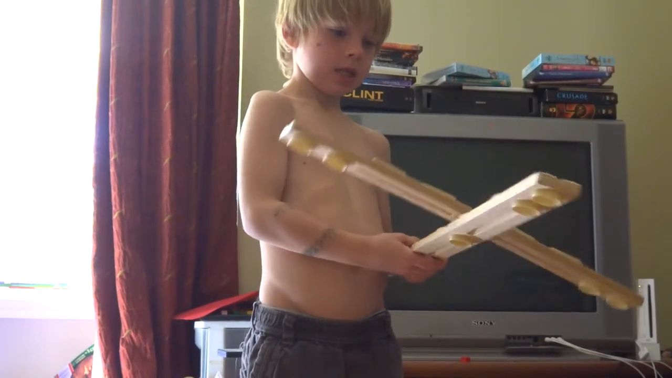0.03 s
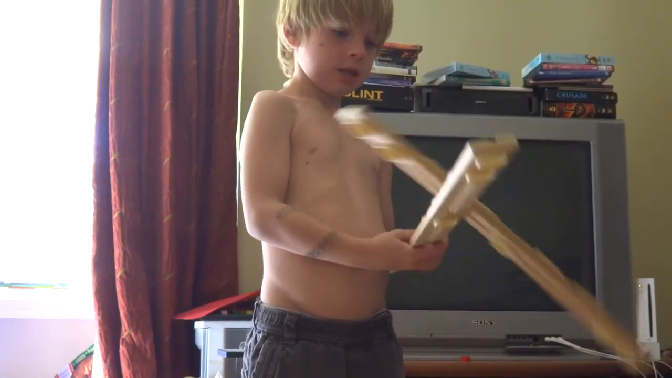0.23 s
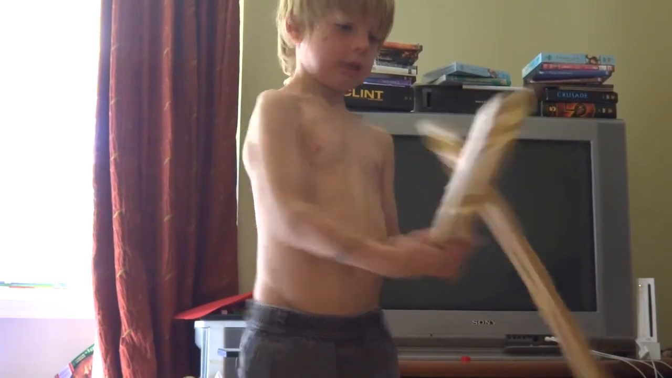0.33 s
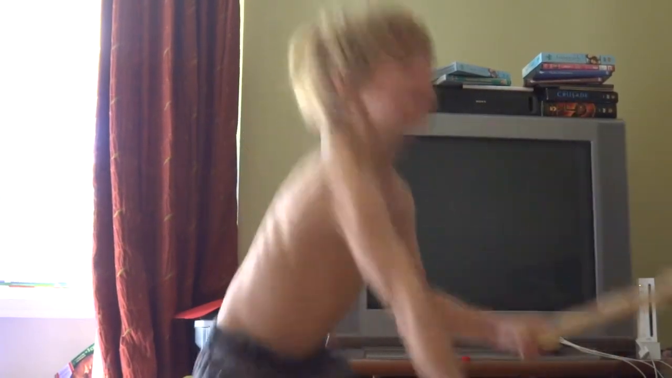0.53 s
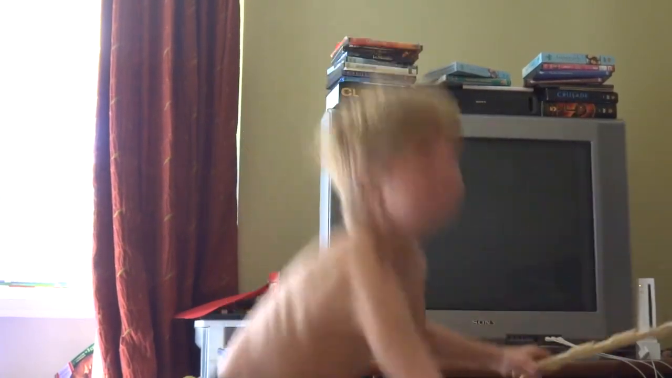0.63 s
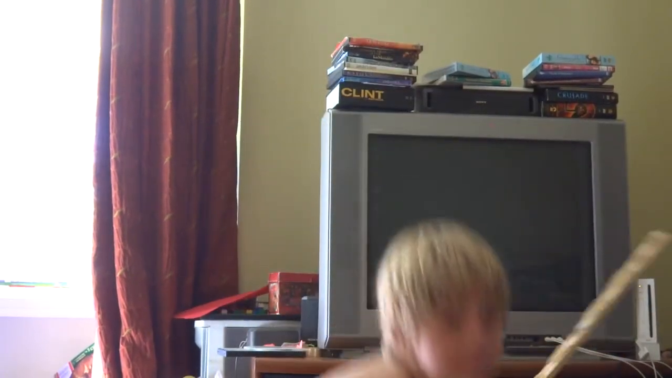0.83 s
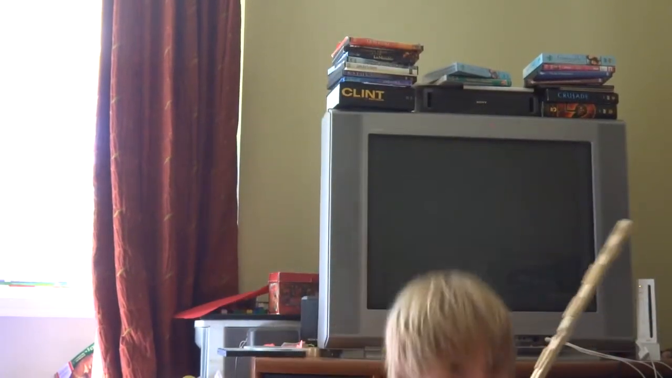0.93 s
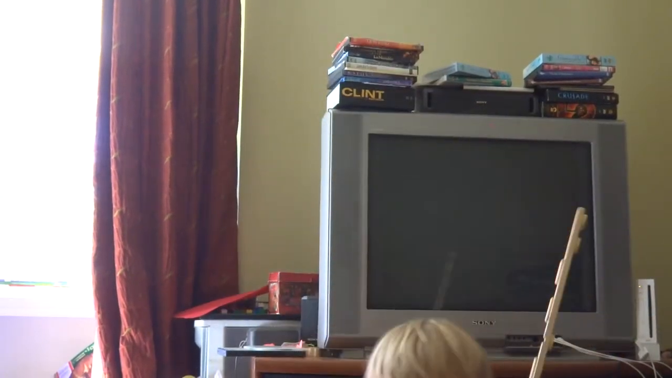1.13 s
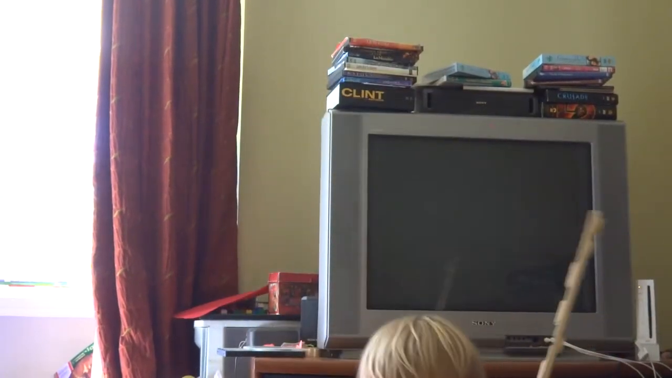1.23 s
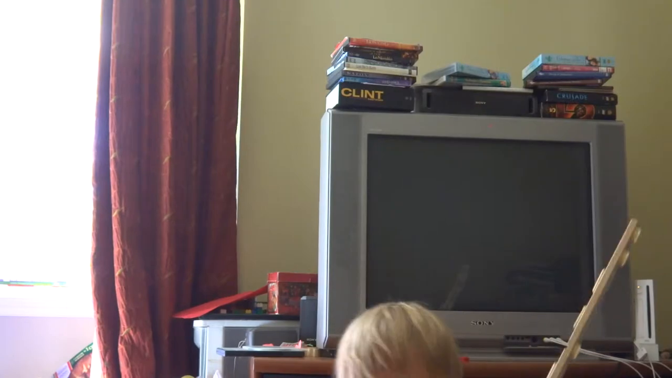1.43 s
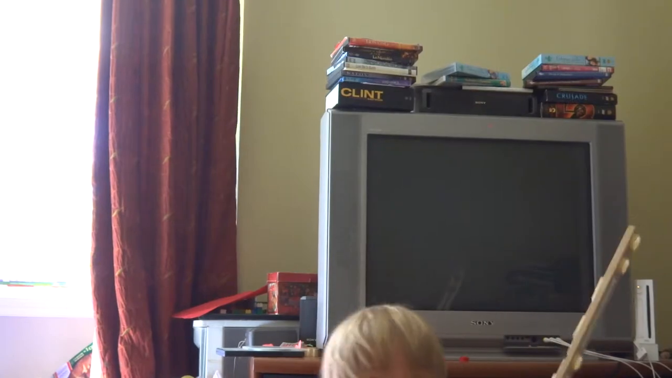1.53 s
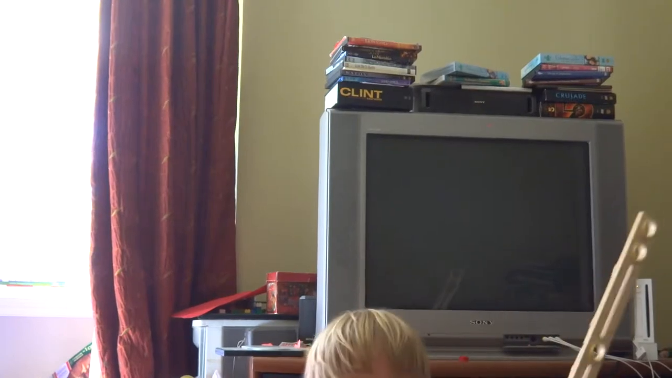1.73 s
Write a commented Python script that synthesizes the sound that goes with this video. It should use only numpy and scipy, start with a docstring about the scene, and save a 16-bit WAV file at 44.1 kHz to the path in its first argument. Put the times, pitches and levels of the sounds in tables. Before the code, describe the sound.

Light wooden knocks lead to a deep floor thump and a loud, dense clatter of wooden pieces bouncing on boards, quickly thinning to small clicks and rustle; small room, close microphone.

```python
"""Wooden toy pieces rustle and knock together in a child's hands, a body thumps down on a board floor,
and the pieces crash, clatter and bounce on the boards in a small living room, heard close.
Knocks are noisy blows ringing wood modes; clatter, rustle, rattle, clunk, boards and shake are random
taps and noise coloured by a body; squeaks are noise in one resonance; thumps are damped sines."""
import sys
import numpy as np
from scipy import signal
from scipy.fft import rfft, irfft
from scipy.io import wavfile

SR = 44100
rng = np.random.default_rng(int(sys.argv[2]) if len(sys.argv) > 2 else 0)


def file_out(sig):
    """Save sig as 16-bit WAV at sys.argv[1]."""
    # one column per channel
    cols = np.atleast_2d(sig).T
    # limit, then scale
    lim = np.clip(cols, -1, 1)
    pcm = np.round(lim * 32767).astype(np.int16)
    wavfile.write(sys.argv[1], SR, pcm)


N = 77175


def amp(db):
    """Decibels to gain."""
    return 10 ** (np.asarray(db) / 20)


def evened(x):
    """Scales to rms 1."""
    return x / np.sqrt(np.mean(x ** 2) + 1e-20)


def read(points, hz):
    """Reads a table on a log-frequency axis."""
    f, value = np.transpose(points)
    return np.interp(np.log(hz + 1), np.log(f + 1), value)


def add(mix, start_s, sound):
    """Mixes a sound in at a time."""
    part = mix[round(start_s * SR):][:len(sound)]
    part += sound[:len(part)]


def spread(a, b):
    """Left is a; right blends a with b by the likeness at each frequency; a level lean tilts the pair."""
    # Each row: frequency in Hz, left-right likeness from 0 to 1.
    likeness = [(60, 0.9), (140, 1), (350, 0.91), (840, 0.63), (2010, 0.53), (4840, 0.63), (11600, 0.75)]
    # Each row: frequency in Hz, left minus right in dB.
    lean_db = [(60, 1), (220, 0.5), (840, -1.0), (3120, -2), (11600, 0.5)]
    hz = np.fft.rfftfreq(N, 1 / SR)
    same = np.clip(read(likeness, hz), 0, 1)
    lean = amp(read(lean_db, hz) / 2)
    za, zb = rfft(a), rfft(b)
    left = za * lean
    right = (same * za + np.sqrt(1 - same ** 2) * zb) / lean
    return np.array([irfft(left, N), irfft(right, N)])


def level(curve, layer=None):
    """Gain over time: a slow background plus, if a layer is given, its part of every spill, by power."""
    # Starts of the spills of many pieces at once, in seconds.
    spill_start_s = [.172, .231, .29, .387, .480, .519, .536, .652, .7155, .864, .955, 1.080, 1.192, 1.449]
    # Each row, one spill: rise in seconds (0.1 ms is added), length of the sag in seconds,
    # clatter level in dB, top level in dB, body level in dB, sag in dB per second.
    spills = [(0.0011, 0.021, -42, -49, -55, 158), (0.0041, 0.11, -26.5, -63, -35, 196),
              (0.038, 0.058, -30, -38, -49.5, 89), (.003, 0.02, -29, -31, -34.5, 253),
              (0.002, 0.0093, -38, -47, -39, 198), (0.0065, 0.043, -59, -55, -39, 160),
              (0.0084, 0.12, -41.5, -32, -64, 47), (0.0013, 0.022, -31, -31, -40, 205),
              (0.0018, 0.12, -19, -27, -35.5, 23.5), (0.0014, 0.036, -27, -44, -21.5, 49),
              (.011, 0.048, -20, -30, -30, 58), (0.0066, 0.021, -22.5, -60, -23, 37),
              (0.0042, .025, -41.5, -66, -39.5, 200), (0.0035, 0.075, -39, -39.5, -41.5, 53)]
    # Fall after the sag in dB per second: clatter, top, body.
    end_db_per_s = 267, 320, 390
    t = np.arange(N) / SR
    s, db = np.transpose(curve)
    power = amp(np.interp(t, s, db)) ** 2
    if layer is None:
        return np.sqrt(power)
    for start_s, row in zip(spill_start_s, spills):
        since = t - start_s
        rise_s, length_s, sag_db_per_s = row[0] + 1e-4, row[1], row[5]
        fall_db = sag_db_per_s * np.clip(since - rise_s, 0, length_s)
        fall_db = fall_db + end_db_per_s[layer] * np.maximum(since - rise_s - length_s, 0)
        spill = np.clip(since / rise_s, 0, 1) * amp(row[2 + layer] - fall_db)
        power = power + spill ** 2
    return np.sqrt(power)


def patter(gain_t, tone, per_s, spread_db, tap_s, wash):
    """Random decaying taps over a steady wash shape noise, coloured by a body and following a level curve."""
    # Narrow rings of the pieces. Each row: frequency in Hz, width at half the dB in Hz, dB over the body.
    rings = [(839, 16.7, 7), (930, 29, 10), (1122, 16.7, 8.5), (1547, 20, 6), (1926, 66, 9.5),
             (2274, 42, 8), (3140, 124, 6.5), (3670, 160, 13), (4252, 78, 8), (4480, 17, 4),
             (5310, 23, -10), (5940, 20, -13), (6080, 20, -4), (6210, 17, 8.5), (7200, 76, 6.5),
             (7670, 140, 9.5), (9510, 40, 5)]
    luck = np.minimum(rng.exponential(1, N), 2.2)
    size = amp(spread_db * luck) * (rng.random(N) < per_s / SR)
    t = np.arange(2000) / SR
    taps = signal.oaconvolve(size, np.exp(-t / tap_s))[:N]
    shape = evened(taps) + wash
    hz = np.fft.rfftfreq(N, 1 / SR)
    rings_db = sum(db / (1 + (2 * (hz - f) / width) ** 2) for f, width, db in rings)
    in_band = (hz > tone[0][0]) * (hz < tone[-1][0])
    gain = amp(read(tone, hz) + rings_db) * in_band
    a, b = irfft(rfft(shape * rng.standard_normal((2, N))) * gain, N)
    return evened(spread(a, b)) * gain_t


def clatter():
    """Dense clatter of many pieces: 900 very short taps a second over a strong wash."""
    # Each row: time in seconds, background level in dB.
    curve = [(0, -62.5), (.17, -48), (.3, -37), (.41, -46), (.7, -47), (.86, -38), (1.05, -30), (1.14, -47),
             (1.212, -54), (1.3, -54), (1.412, -43.5), (1.54, -42), (1.6, -44.5), (1.75, -47)]
    # Each row: frequency in Hz, body gain in dB.
    tone = [(880, -17), (1500, -2.5), (1910, -6.5), (2800, 3.5), (3140, 1), (3820, -3), (4290, 5),
            (6010, 12.5), (8780, -21), (9870, -3.5), (11200, -26), (14600, -51), (22000, -120)]
    return patter(level(curve, 0), tone, per_s=900, spread_db=0.87, tap_s=0.00031, wash=2.0)


def rustle():
    """Fine high rustle of pieces sliding: 600 near-equal taps a second."""
    # Each row: time in seconds, background level in dB.
    curve = [(0.0, -53), (0.112, -46.5), (0.432, -45.5), (0.628, -38.5), (0.74, -43), (0.95, -49),
             (1.116, -55.5), (1.378, -49.5), (1.54, -42.5), (1.75, -45.5)]
    # Each row: frequency in Hz, body gain in dB.
    tone = [(2650, -39), (4500, -29), (4600, -39), (4950, -4), (5180, -60), (6670, 3), (7310, 1),
            (8640, -0.5), (9760, 6), (11200, -6), (14600, -29), (22000, -120)]
    return patter(level(curve, 1), tone, per_s=600, spread_db=1.0, tap_s=0.0014, wash=1.0)


def rattle():
    """Hollow rattle of the pieces' bodies: 300 uneven taps a second."""
    # Each row: time in seconds, background level in dB.
    curve = [(0, -68), (.13, -62.5), (.19, -49.5), (.354, -48), (.6, -52), (.7, -55), (.8, -34), (.93, -29),
             (1.05, -30.5), (1.16, -38), (1.246, -51), (1.4, -53.5), (1.55, -53.5), (1.66, -48.5),
             (1.75, -54.5)]
    # Each row: frequency in Hz, body gain in dB.
    tone = [(460, -65), (780, -5.5), (1090, 3), (1260, 1), (1550, 3), (1690, 0.5), (2140, 1), (2370, -3.5),
            (3500, -12), (4550, -34), (7700, -120)]
    return patter(level(curve, 2), tone, per_s=300, spread_db=7.6, tap_s=0.0029, wash=1.0)


def clunk():
    """Dull low-middle clunk of the larger pieces: 150 uneven taps a second, little wash."""
    # Each row: time in seconds, level in dB.
    curve = [(0.0, -66.5), (0.14, -69), (0.248, -60), (0.36, -68), (0.388, -49.5), (0.55, -43.5),
             (0.614, -59), (0.638, -71), (0.736, -39), (0.828, -49), (0.876, -28), (0.974, -41),
             (1.076, -38), (1.364, -59.5), (1.51, -53), (1.588, -70), (1.666, -72), (1.75, -67)]
    # Each row: frequency in Hz, body gain in dB.
    tone = [(380, 0), (450, 5), (600, 4.5), (760, 3.5), (880, 1.5)]
    return patter(level(curve), tone, per_s=150, spread_db=7.5, tap_s=0.0034, wash=0.36)


def boards():
    """Floorboards drumming: 90 low taps a second."""
    # Each row: time in seconds, level in dB.
    curve = [(0.0, -70.5), (0.14, -69), (0.252, -65.5), (0.354, -77), (0.388, -54), (0.432, -54.5),
             (0.588, -55), (0.608, -107), (0.632, -31.5), (0.778, -39.5), (0.856, -34.5), (0.876, -21),
             (0.91, -22.5), (0.964, -30.5), (0.994, -26), (1.154, -32), (1.184, -37.5), (1.378, -50.5),
             (1.446, -47), (1.632, -56), (1.666, -47), (1.75, -59)]
    # Each row: frequency in Hz, body gain in dB.
    tone = [(59, -41), (100, -15.5), (140, -17), (173, -7.5), (243, 1), (313, -7.5), (419, -13.5),
            (526, -23), (700, -21.5), (910, -25.5), (1540, -120)]
    return patter(level(curve), tone, per_s=90, spread_db=4.4, tap_s=0.0097, wash=0.65)


def shake():
    """Deep shake beneath the boards: 30 long taps a second."""
    # Each row: time in seconds, level in dB.
    curve = [(0.0, -64), (0.306, -69.5), (0.482, -58.5), (0.75, -47), (0.804, -45), (0.954, -39.5),
             (1.13, -48.5), (1.262, -51), (1.666, -65), (1.75, -66)]
    # Each row: frequency in Hz, body gain in dB.
    tone = [(12, -43), (20, -32), (43, 0.5), (81, -10), (134, -5.5), (160, -11.5), (210, -14), (350, -120)]
    return patter(level(curve), tone, per_s=30, spread_db=4.1, tap_s=0.052, wash=1.0)


def knock(middle_db, low_db, top_db):
    """A short rough blow rings the wood; low, middle and top modes take their own strength."""
    # Each row: nominal frequency in Hz, level within its group in dB, t60 in seconds.
    wood_modes = [(920, -33, 0.0089), (1327, 8, 0.042), (1804, 18, 0.045), (1950, -8, .014),
                  (2530, 10, 0.022), (3265, 0.5, 0.015), (3900, 2, .012), (4360, 1.5, 0.014),
                  (5260, -6, 0.03), (6110, 1.5, 0.0092), (6810, -4, 0.024), (7320, -5, .008),
                  (8500, -8.5, 0.013), (9280, -5.5, 0.015), (10360, -7.5, 0.012)]
    blow_t60_s = 0.0073
    t = np.arange(2600) / SR
    hz, mode_db, t60_s = np.transpose(wood_modes)[:, :, None]
    detune, phase = rng.random((2, len(wood_modes), 1))
    cycles = hz * (0.96 + 0.081 * detune) * t + 0.35 * phase
    modes = amp(mode_db - 60 * t / t60_s) * np.sin(2 * np.pi * cycles)
    modes = modes * np.minimum(t / 0.00015, 1)  # soft contact
    blow = rng.standard_normal(len(t)) * amp(-60 * t / blow_t60_s)
    blow[0] += 4.0
    rung = signal.fftconvolve(modes, blow[None], axes=1)[:, :len(t)]
    low, top = hz[:, 0] < 2700, hz[:, 0] > 7300
    out = np.zeros(len(t))
    for group, db in ((low, low_db), (top, top_db), (~(low | top), middle_db)):
        part = rung[group].sum(0)
        out += amp(db) * part / abs(part).max()
    return out


def knocks():
    """Single knocks of wood on wood, high-passed at 750 Hz."""
    # Each row: start in seconds, then peak before the high-pass in dB of the middle, low and top modes.
    hits = [(0.0135, -38, -79, -54), (0.065, -43, -77, -56), (0.098, -52, -47, -47),
            (0.1741, -51, -30.5, -30), (0.2296, -17, -20, -58), (0.2364, -15, -47, -57),
            (0.385, -21, -20.5, -29), (0.3933, -42, -22.5, -21), (0.433, -23.5, -34, -41),
            (0.4797, -23, -47, -34), (0.554, -45, -43, -23.5), (0.6435, -18.5, -26, -23.5),
            (0.6544, -46, -45, -40), (0.715, -8.5, -32, -44), (0.719, -5.5, -40, -24),
            (0.7358, -11, -47, -18.5), (0.8636, -24, -22, -45), (0.944, -20, -14, -40),
            (0.9542, -12.5, -36, -22), (0.9684, -7, -25, -40), (1.0767, -9, -17, -61),
            (1.3203, -69, -48, -20), (1.4569, -23, -33, -18.5), (1.47, -26.5, -26, -32),
            (1.4814, -44, -33, -21), (1.4933, -37, -36, -34), (1.5036, -19, -28.5, -30)]
    out = np.zeros(N)
    for start_s, middle_db, low_db, top_db in hits:
        add(out, start_s, knock(middle_db, low_db, top_db))
    return signal.sosfilt(signal.butter(3, 750, "high", fs=SR, output="sos"), out)


def room(x):
    """Two unrelated decaying noise tails stand for the reflections, left and right."""
    t60_s, gap_s = 0.35, 0.004
    t = np.arange(SR // 2) / SR
    tail = rng.standard_normal((2, len(t))) * amp(-60 * t / t60_s) * (t > gap_s)
    return signal.fftconvolve(x[None], tail / np.linalg.norm(tail[0]), axes=1)[:, :N]


def squeak(length_s, db, hz, width_hz):
    """A short swell of noise ringing in one two-pole resonance."""
    t = np.arange(0, length_s, 1 / SR)
    r = np.exp(-np.pi * width_hz / SR)
    poles = [1, -2 * r * np.cos(2 * np.pi * hz / SR), r * r]
    noise = rng.standard_normal(len(t) + 500)
    ring = signal.lfilter([1], poles, noise)[500:]  # settled part
    return amp(db) * np.sin(np.pi * t / length_s) * evened(ring)


def squeaks():
    """A hollow piece rings briefly as it slides."""
    # Each row: start in seconds, length in seconds, rms before the swell in dB, pitch in Hz, width in Hz.
    slides = [(0.243, .095, -50, 1134, 59), (0.394, 0.094, -48, 500, 60), (0.518, 0.024, -30, 1340, 147),
              (.750, 0.025, -33, 797, 60), (1.404, 0.037, -44, 1940, 80), (1.465, 0.029, -31, 2025, 80),
              (1.643, 0.077, -45.5, 2270, 80)]
    out = np.zeros(N)
    for start_s, length_s, db, hz, width_hz in slides:
        add(out, start_s, squeak(length_s, db, hz, width_hz))
    return out


def thumps():
    """Low damped swings of the floor under a landing body, faded down quickly at 0.714 s."""
    # Start of each swing in seconds.
    starts_s = [.6345, .645, .650, .657]
    # Each row: level before decay and onset in dB, pitch in Hz, t60 in seconds.
    swings = [(-6.5, 137, 0.031), (-25, 210, 0.17), (-16, 43, 0.27), (-16, 93, 0.52)]
    onset_s, fade_start_s, fade_s = 0.0032, 0.714, 0.0042
    out = np.zeros(N)
    t = np.arange(SR // 4) / SR
    for start_s, (db, hz, t60_s) in zip(starts_s, swings):
        envelope = amp(db - 60 * t / t60_s) * np.minimum(t / onset_s, 1)
        add(out, start_s, -envelope * np.sin(2 * np.pi * hz * t))
    return out * np.clip((fade_start_s - np.arange(N) / SR) / fade_s + 1, 0.05, 1)


def scene():
    """Sums the tap layers, knocks with their room, squeaks and thumps."""
    wet_db = -13
    layers = clatter() + rustle() + rattle() + clunk() + boards() + shake()
    wood = knocks()
    wet = amp(wet_db) * room(wood)
    wood = wood + squeaks()
    low = thumps()
    # shifted copies (in samples) make the left-right difference
    return layers + spread(wood, np.roll(wood, 9)) + wet + spread(low, np.roll(low, 150))


def record(dry):
    """Band limit: a linear-phase low-pass."""
    edge_hz = 11150
    lowpass = signal.firwin(301, edge_hz, window=("kaiser", 7), fs=SR)
    return signal.oaconvolve(dry, lowpass[None], "same")


dry = scene()
out = record(dry)
file_out(out)
```